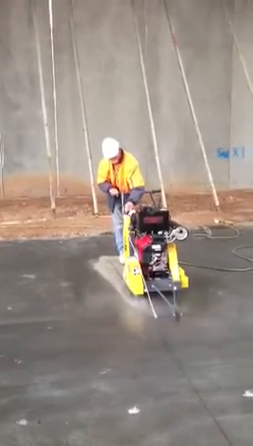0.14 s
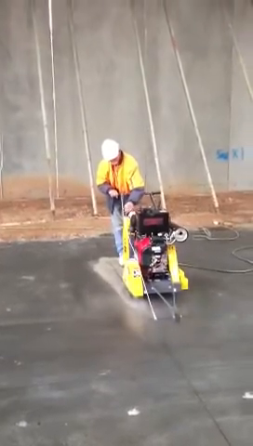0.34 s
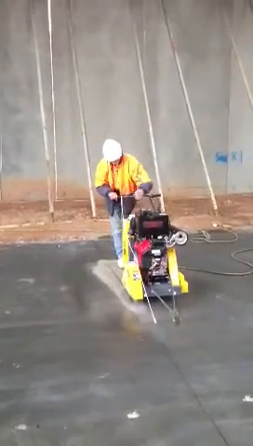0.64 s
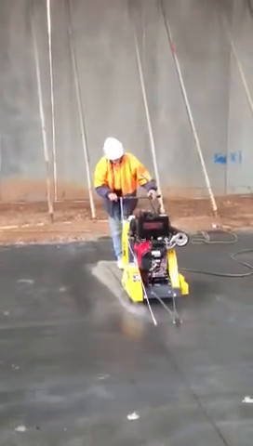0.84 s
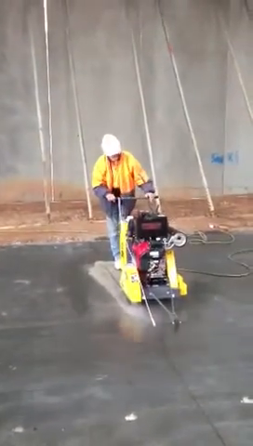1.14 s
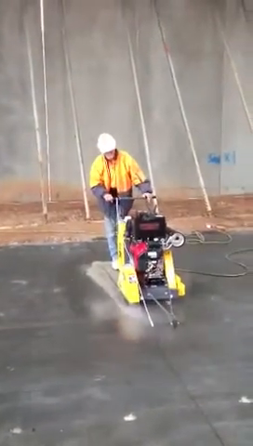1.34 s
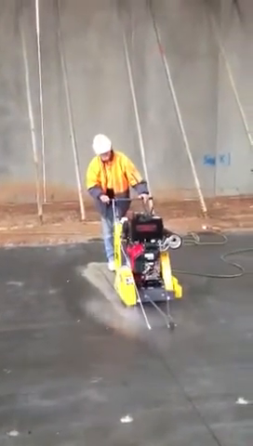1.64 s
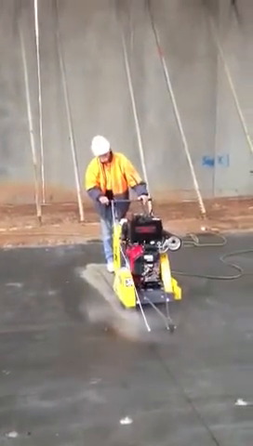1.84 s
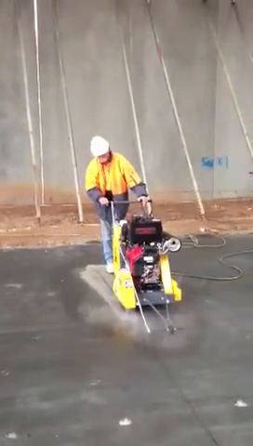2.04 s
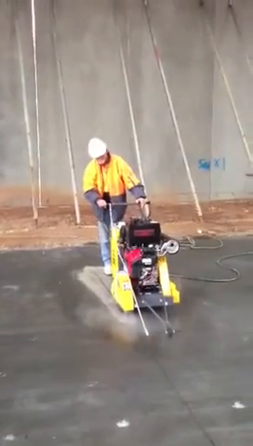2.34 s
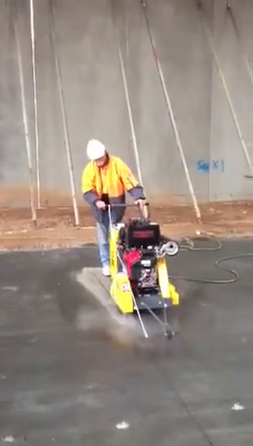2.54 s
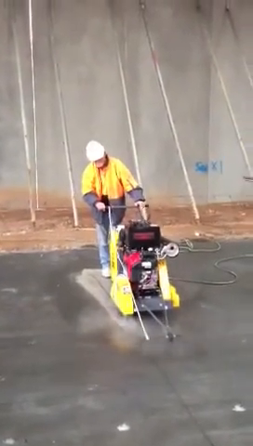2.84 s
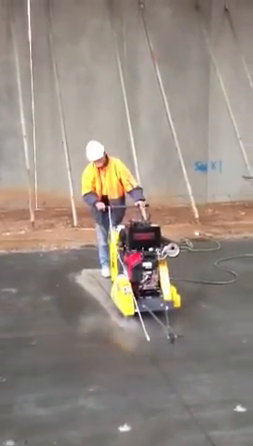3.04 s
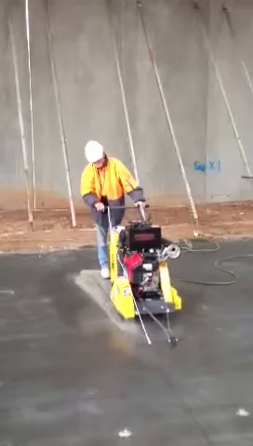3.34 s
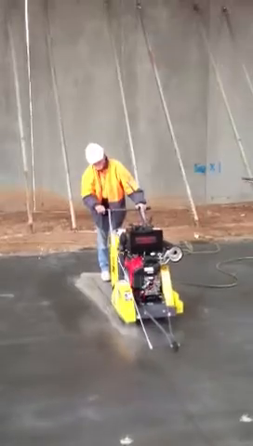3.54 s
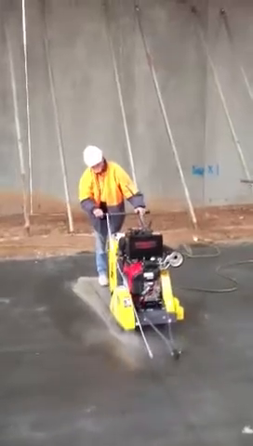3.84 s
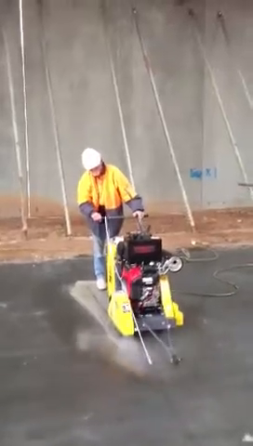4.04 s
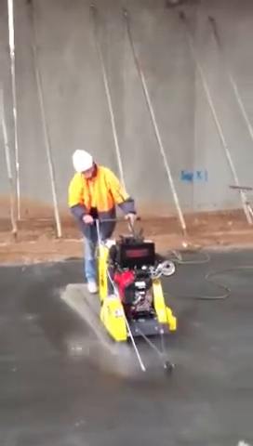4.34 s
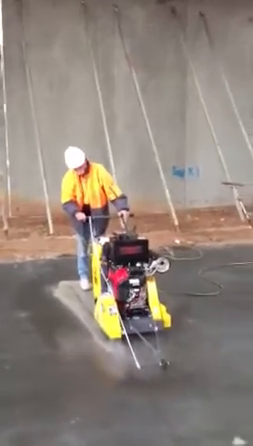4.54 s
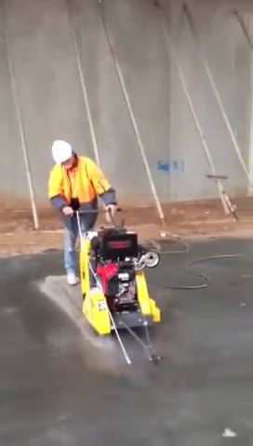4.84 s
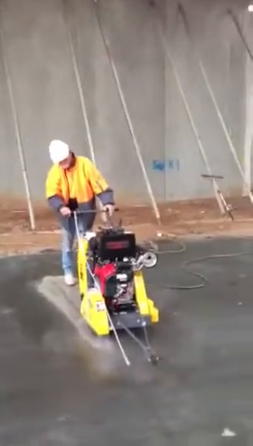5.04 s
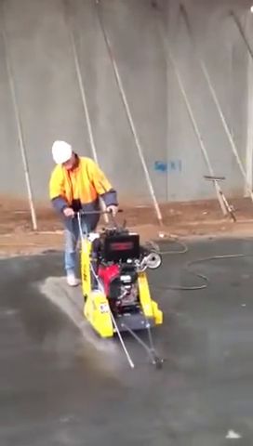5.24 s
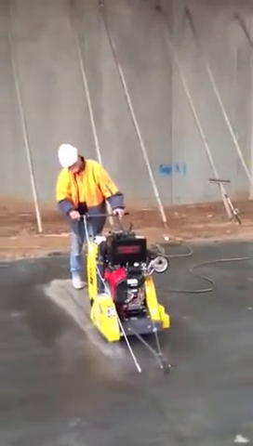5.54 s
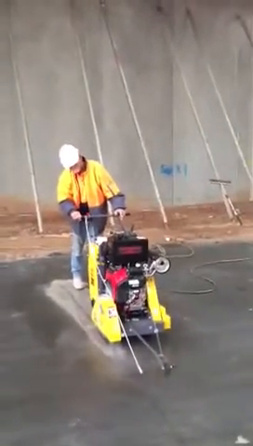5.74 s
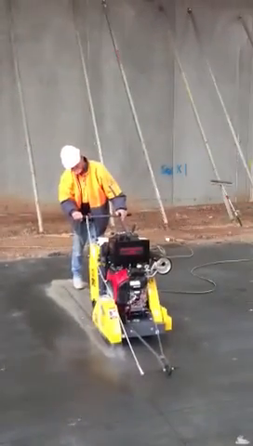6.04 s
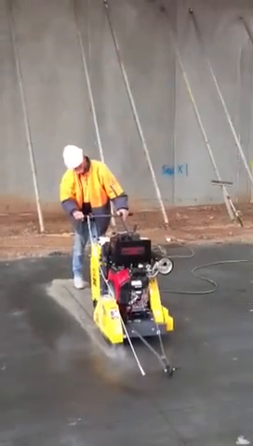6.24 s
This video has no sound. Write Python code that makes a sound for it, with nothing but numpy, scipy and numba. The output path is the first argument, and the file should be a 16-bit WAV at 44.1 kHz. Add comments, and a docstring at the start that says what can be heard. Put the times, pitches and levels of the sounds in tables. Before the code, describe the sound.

From 0 to about 6.4 seconds a walk-behind concrete saw cuts continuously, with no start or stop. Loudest is a harsh, gritty metallic hiss, concentrated around 3 to 9 kHz, flickering rapidly as the blade bites stone, with airy wet spray on top and a fainter frame rattle near 2 kHz. Below it a lumpy twin-cylinder engine drones at roughly 26 to 30 cycles per second, sagging around 1.3, 2.4 and 4.0 seconds and recovering after each. A narrow steel whine near 4.3 kHz peeks out around 1.1, 1.7 to 1.9 and 5.4 seconds. Small dips of the whole saw come near 0.9, 1.25, 1.5, 3.9 and 4.15. From about 3.7 the blade hiss grows slightly stronger and brighter while the engine recedes a little. Quiet, dull echo of a large bare shed surrounds it; mono phone sound, thin in bass, slightly squashed at peaks.

```python
"""A steel saw blade sings and hisses over a throbbing engine drone: a walk-behind concrete saw in a large bare shed.
Random grit impacts ring the resonances of the blade rim, the guard and frame, and the spray of slurry.
A V-twin engine hunts under load: multiples of its cycle make the exhaust note, and gas puffs of noise ring
its pipe and casing. Eight cross-fed delay lines make the echo; a mono phone removes bass and rounds peaks."""
import sys
import numpy as np
from scipy import signal
from scipy.io import wavfile
from scipy.ndimage import uniform_filter1d
from numba import njit

SR = 44100
rng = np.random.default_rng(int(sys.argv[2]) if len(sys.argv) > 2 else 0)


def materialize(psi):
    """Save the field psi as 16-bit PCM at rate SR to the path in sys.argv[1].

    A 1-D psi becomes a single channel; in a 2-D psi each row is a channel.
    """
    bounded = np.clip(np.atleast_2d(psi).T, -1, 1)
    quanta = np.round(bounded * 32767).astype(np.int16)
    wavfile.write(sys.argv[1], SR, quanta)


N = 282240
TIME_S = np.arange(N) / SR
FROM_MIDDLE_S = TIME_S - TIME_S.mean()


def undb(db):
    """Decibels to amplitude gain."""
    return 10 ** (np.asarray(db) / 20)


def unit(x):
    """Scale to rms 1."""
    return x / np.sqrt(np.mean(x ** 2))


def walk(rate_hz):
    """Smooth random wander of spread near 1: steps held 1 / rate_hz, averaged twice over a step."""
    step = int(SR / rate_hz)
    held = np.repeat(rng.standard_normal(N // step + 1), step)
    return 1.24 * uniform_filter1d(uniform_filter1d(held, step), step)[:N]


def curves(table):
    """Join table rows by straight lines: one array of N samples for each column after the time."""
    row_s, *columns = np.transpose(table)
    return [np.interp(TIME_S, row_s, column) for column in columns]


def bumps(events):
    """Sum of bell-shaped level changes in dB; each length spans the bell at 1/e of its height."""
    return sum(db * np.exp(-(2 * (TIME_S - centre_s) / length_s) ** 2) for centre_s, length_s, db in events)


def follow(level_db, share, leader_db, fade_db_per_s=0):
    """Level that takes a share of the leader's swings about its mean and drifts steadily."""
    return level_db + share * (leader_db - leader_db.mean()) + fade_db_per_s * FROM_MIDDLE_S


def ring(x, modes, waver_db, rate_hz, tilt_db=0):
    """Bank of resonances at rms 1, each driven by its own rotation of x and wavering independently."""
    pivot_hz = 5700  # tilt_db is per octave about this
    out = 0
    for hz, width_hz, db in modes:
        drive = np.roll(x, rng.integers(N))
        band = unit(signal.lfilter(*signal.iirpeak(hz, hz / width_hz, SR), drive))
        level_db = db + waver_db * walk(rate_hz) + tilt_db * np.log2(hz / pivot_hz)
        out = out + undb(level_db) * band
    return unit(out)


def blade(grit, rim_db, low_db):
    """Steel rim modes rung by grit in three bands; the middle band's colour climbs, and one mode whines."""
    # Rim modes. Each row: centre in Hz, width in Hz, level in dB.
    low_modes = [(3365, 970, -4.5), (3630, 450, -2), (3768, 140, -2.5), (4037, 59, -4.5), (4330, 270, -2.5),
                 (4445, 120, -10.5), (4465, 96, -4)]
    middle_modes = [(4776, 240, -1), (4870, 53, -3), (5280, 150, -10), (5326, 200, 0.5), (5497, 32, -2),
                    (5670, 300, -4), (6010, 82, 0), (6150, 68, -3.5), (6420, 250, -3)]
    high_modes = [(6700, 270, 0.5), (7110, 370, 4.5), (7410, 54, 0), (7330, 200, -2.5), (8170, 340, 0),
                  (8600, 280, -3), (8080, 1140, 1.5)]
    whine_mode = [(4256, 38, 0)]
    # Level changes of the whining mode. Each row: centre in s, length in s, change in dB.
    whine_events = [(1.14, 0.15, 8), (1.41, 0.13, 3), (1.69, 0.11, 9), (1.93, .2, 10), (2.23, 0.075, -2),
                    (3.4, 0.57, 2), (5.4, 0.47, 6.5)]
    tilt_db_per_octave_s = 1
    whine_db = -32 + bumps(whine_events)
    high_db = follow(-22, 0.42, low_db, fade_db_per_s=-0.14)

    middle = ring(grit, middle_modes, waver_db=1.3, rate_hz=14, tilt_db=tilt_db_per_octave_s * FROM_MIDDLE_S)
    low = ring(grit, low_modes, waver_db=1.64, rate_hz=15)
    whine = ring(grit, whine_mode, waver_db=1.3, rate_hz=18)
    high = ring(grit, high_modes, waver_db=1.7, rate_hz=14)
    return undb(rim_db) * middle + undb(low_db) * low + undb(whine_db) * whine + undb(high_db) * high


def spray(grit, rim_db):
    """Hiss of grit and slurry: broad treble resonances that follow the middle rim level."""
    # Spray bands. Each row: centre in Hz, width in Hz, level in dB.
    spray_bands = [(9400, 140, -4), (9950, 2200, 7), (10200, 2200, 1.5), (13700, 1700, -3.5)]
    return undb(follow(-22.5, .6, rim_db)) * ring(grit, spray_bands, waver_db=1.0, rate_hz=16)


def guard(grit, note_db):
    """Blade guard and frame rattle: grit rings mid-range modes whose level follows the exhaust note."""
    # Guard and frame modes. Each row: centre in Hz, width in Hz, level in dB.
    guard_modes = [(1550, 49, -8), (1698, 66, 0.5), (1833, 250, -1), (1931, 38, 0.5), (2055, 51, 0),
                   (2000, 39, -17), (2476, 110, -4), (2770, 130, -9), (2890, 145, 0), (2280, 460, 1.5)]
    level_db = follow(-29.5, 0.36, note_db, fade_db_per_s=-0.24)
    return undb(level_db) * ring(grit, guard_modes, waver_db=1.8, rate_hz=7.7)


def cut(rim_db, low_db, note_db):
    """Dense uneven grit impacts excite blade, spray and guard; the bite flickers with the aggregate."""
    grit = rng.standard_normal(N) * undb(1.9 * rng.exponential(size=N))
    bite = undb(0.14 * walk(25.03) + 0.68 * walk(50))
    return bite * (blade(grit, rim_db, low_db) + spray(grit, rim_db) + guard(grit, note_db))


def exhaust_note(cycle, cycle_hz, hum_db, note_db):
    """Multiples of the cycle, smeared by the pipe and lifted as they glide through its resonances."""
    # Exhaust note: multiples of the cycle rate, and the level of each in dB.
    multiples = [3, 5, 6, 7, 8, 9, 10, 11, 12, 13, 14, 15, 16]
    multiple_levels_db = [-12.5, -3, -4, -14.5, -10, -13, -23.5, -12, -12.5, -20, -23, -10.5, -15]
    # Pipe resonances. Each row: centre in Hz, width in Hz, lift in dB.
    pipe_lifts = [(146.2, 4.9, 2.5), (166, 5.1, 1.5), (219.4, 8.1, 10), (313.2, 5.3, 8.5), (431, 11, 6)]
    hum_up_to = 6  # highest multiple in the low hum
    smear_cycles = .04  # extra delay of each multiple over the one below

    note = 0
    for k, multiple_db in zip(multiples, multiple_levels_db):
        lift_db = sum(db / (1 + (2 * (k * cycle_hz - hz) / width_hz) ** 2) for hz, width_hz, db in pipe_lifts)
        group_db = note_db if k > hum_up_to else hum_db
        level_db = group_db + multiple_db + lift_db + 0.8 * walk(12)
        note = note + np.sqrt(2) * undb(level_db) * np.cos(2 * np.pi * k * (cycle - smear_cycles * k))

    # each cycle fires with its own strength, joined by a short ramp
    strengths = undb(1.3 * rng.standard_normal(int(cycle[-1]) + 2))
    strength = strengths[(cycle + .5).astype(int)]
    return uniform_filter1d(strength, size=200) * note


def gas_puffs(cycle, note_db):
    """Two decaying puffs a cycle gate noise that rings the exhaust pipe and engine casing."""
    # Pipe rumble and casing modes. Each row: centre in Hz, width in Hz, level in dB.
    rumble_modes = [(158, 38, 2), (234, 75, 4.5), (319, 42, 2), (438, 47, 3)]
    casing_modes = [(303, 830, -2), (550, 71, -1.5), (672, 92, 3.5), (760, 190, 2), (780, 250, 4.5),
                    (1180, 340, -3.5), (1305, 62, -1)]
    second_firing_cycles = .375  # rear cylinder: 270 of 720 degrees
    second_db, rumble_db = 0.5, -2.5

    front = np.exp(-(cycle % 1) / 1.1)
    rear = np.exp(-((cycle - second_firing_cycles) % 1) / .5)
    puffs = unit(front + undb(second_db) * rear)
    rumble = ring(rng.standard_normal(N), rumble_modes, waver_db=1.6, rate_hz=8)
    casing = ring(rng.standard_normal(N), casing_modes, waver_db=0.5, rate_hz=7.8)
    level_db = follow(-35.5, 0.54, note_db, fade_db_per_s=-0.23)
    return puffs * undb(level_db) * (casing + undb(rumble_db) * rumble)


def engine(cycle_hz, hum_db, note_db):
    """The slightly unsteady cycle rate accumulates into a cycle count that times note and puffs."""
    cycle = np.cumsum(cycle_hz * (1 + 0.0017 * walk(12))) / SR
    return exhaust_note(cycle, cycle_hz, hum_db, note_db) + gas_puffs(cycle, note_db)


@njit
def walls(x, lags, gain, damp):
    """Eight delay lines that feed each other, duller on every round."""
    line, soft, out = np.zeros((8, 8192)), np.zeros(8), np.zeros(len(x))
    for i in range(len(x)):
        total = 0.
        for k in range(8):
            returned = gain[k] * line[k, (i - lags[k]) & 8191]
            soft[k] += (1 - damp) * (returned - soft[k])  # one-pole lowpass
            total += soft[k]
        out[i] = total
        for k in range(8):
            line[k, i & 8191] = x[i] + soft[k] - total / 4
    return out


def shed(saw):
    """Echo of the bare shed: each delay line's loss sets the decay, before treble damping."""
    # Delay of each line in seconds.
    lags_s = np.array([.0347, .0431, .0523, .0613, .0709, .0811, .0929, .1051])
    t60_s, damp, echo_db = 1.2, .4, -20
    gain = undb(-60 * lags_s / t60_s)
    return undb(echo_db) * walls(saw, (lags_s * SR).astype(int), gain, damp)


def scene():
    """Cut and engine dip together; the shed's echo is added, the same in both channels."""
    # Engine hunting under load. Each row: time in s, cycle rate in Hz, level of the low hum in dB,
    # level of the upper multiples in dB.
    engine_course = [(0.0, 27.9, -35, -31.5), (0.28, 27.44, -34, -37), (0.71, 28.6, -30, -31.5),
                     (0.89, 29.3, -35.5, -35.5), (1.07, 28.6, -33.5, -34), (1.25, 26.24, -33, -31.5),
                     (1.35, 25.77, -31, -30.5), (1.51, 26.94, -38, -32.5), (1.62, 28.4, -32, -30.5),
                     (1.85, 29.83, -34.5, -34.5), (2.01, 29.52, -37, -37.5), (2.39, 26.49, -34, -33),
                     (2.67, 28.75, -35, -34), (2.8, 29.2, -35.5, -35.5), (3.4, 28.13, -35, -34),
                     (3.6, 28.34, -34, -35.5), (4.01, 26.17, -39.5, -33), (4.4, 28.8, -34.5, -32),
                     (4.9, 29.3, -39.5, -38.5), (5.61, 27.94, -35.5, -37.5), (6.38, 27.9, -39, -35),
                     (6.4, 28, -47, -36)]
    # Cut. Each row: time in s, level of the middle rim modes in dB, level of the low rim modes in dB.
    cut_course = [(0, -18.5, -20.5), (.2, -17.5, -22), (.35, -19.5, -22.5), (.7, -19, -21.5),
                  (1.15, -18.5, -21.5), (1.7, -19.5, -22), (1.95, -19, -22.5), (2.3, -18, -22),
                  (2.55, -17.5, -22), (2.9, -18, -21.5), (3.4, -18.5, -22), (3.7, -16, -22),
                  (4.0, -16.5, -24.5), (4.4, -17, -22.5), (5.0, -17, -23), (5.5, -16, -29),
                  (6.0, -16.5, -23), (6.4, -16.5, -22.5)]
    # Brief dips of the whole saw. Each row: centre in s, length in s, level change in dB.
    dip_events = [(.88, .1, -2.5), (1.26, .06, -2.5), (1.54, 0.086, -1.5), (3.9, .07, -2),
                  (4.15, 0.13, -2.5), (5.57, .08, -1), (6.13, .06, -0.5)]

    cycle_hz, hum_db, note_db = curves(engine_course)
    rim_db, low_db = curves(cut_course)
    saw = undb(bumps(dip_events)) * (engine(cycle_hz, hum_db, note_db) + cut(rim_db, low_db, note_db))
    heard = saw + shed(saw)
    return np.array([heard, heard])


def record(dry):
    """The phone drops deep bass and top treble; a lopsided soft ceiling adds faint low thumps at peaks."""
    mic_low_hz, top_hz = 126, 15270
    ceiling = .72  # of the symmetric rounding
    thin = signal.sosfilt(signal.butter(4, mic_low_hz, "high", fs=SR, output="sos"), dry)
    rounded = thin / (1 + (thin / ceiling) ** 6) ** (1 / 6)
    lopsided = rounded + 0.49 * rounded ** 4
    # remove the offset left by the even power
    steady = signal.sosfilt(signal.butter(1, 45, "high", fs=SR, output="sos"), lopsided)
    return signal.sosfilt(signal.ellip(16, .2, 80, top_hz, fs=SR, output="sos"), steady)


dry = scene()
out = record(dry)
materialize(out)
```